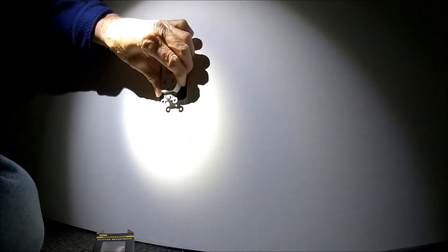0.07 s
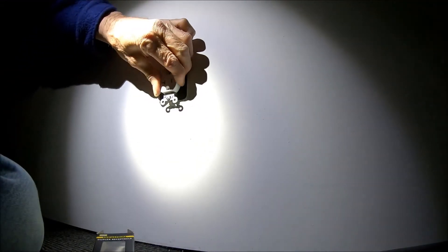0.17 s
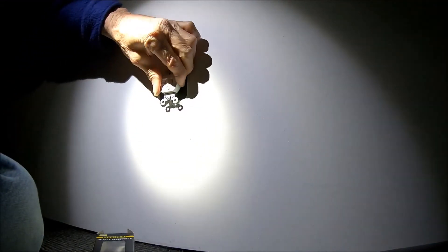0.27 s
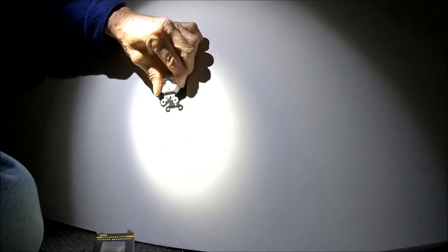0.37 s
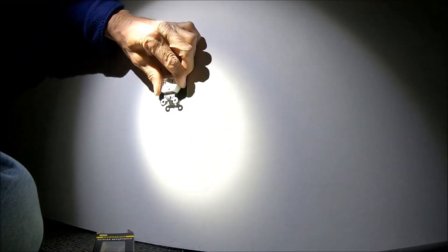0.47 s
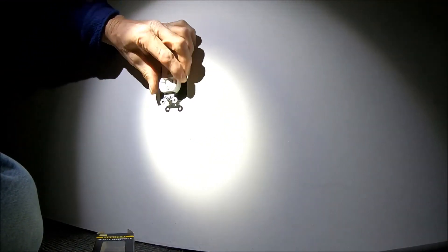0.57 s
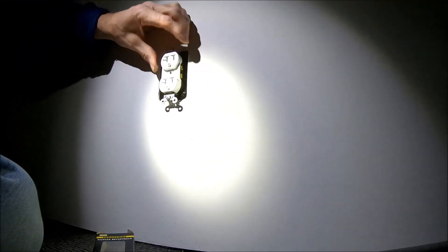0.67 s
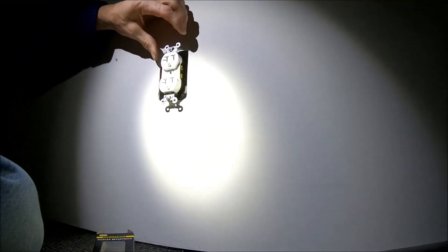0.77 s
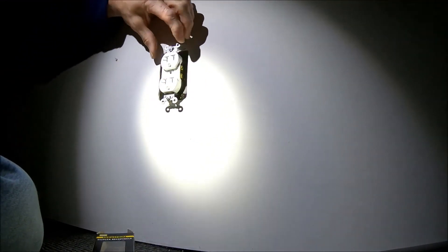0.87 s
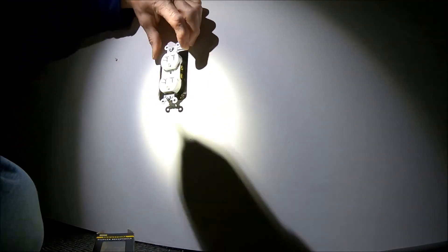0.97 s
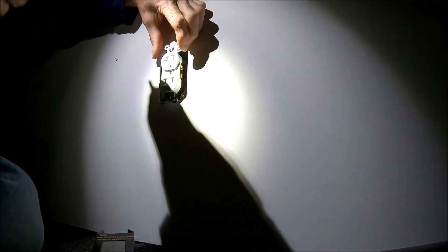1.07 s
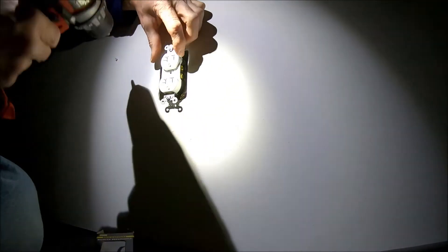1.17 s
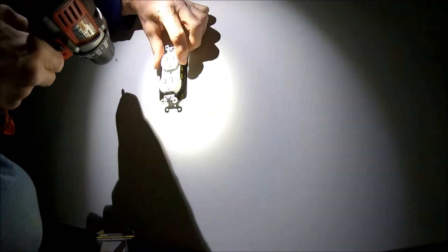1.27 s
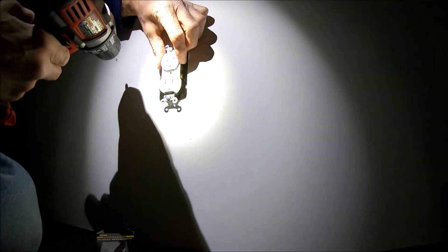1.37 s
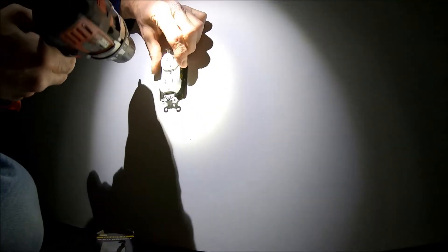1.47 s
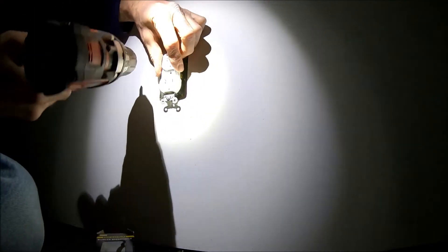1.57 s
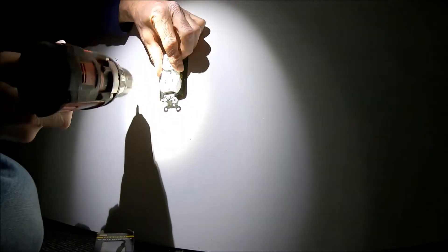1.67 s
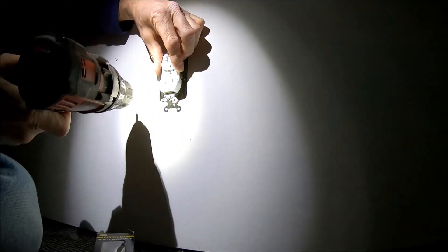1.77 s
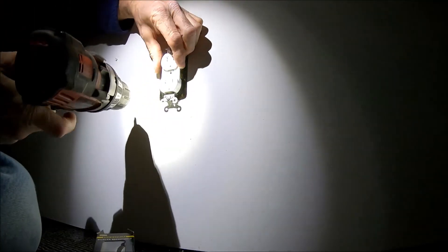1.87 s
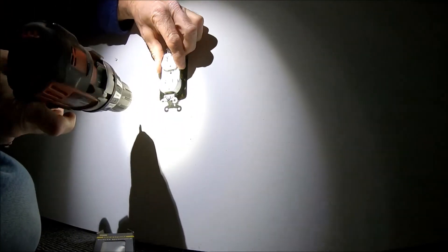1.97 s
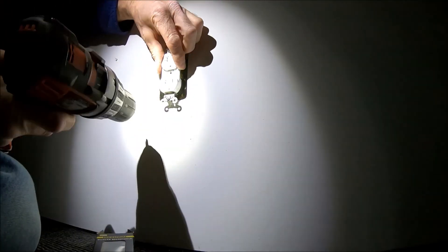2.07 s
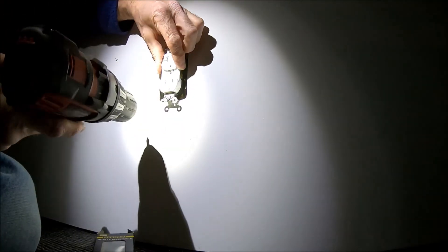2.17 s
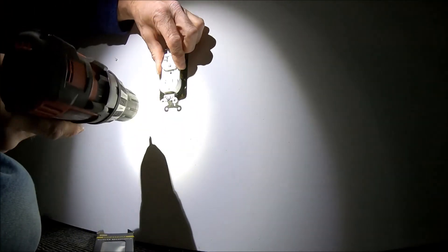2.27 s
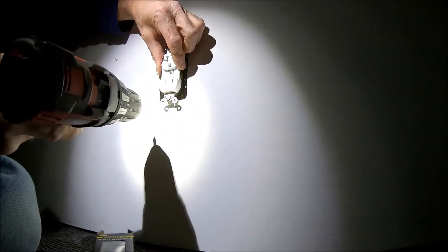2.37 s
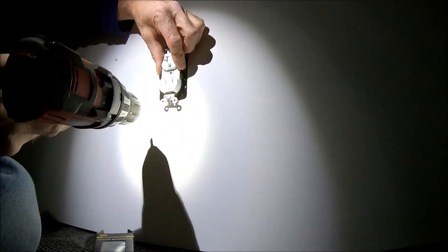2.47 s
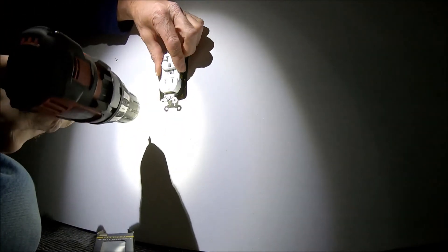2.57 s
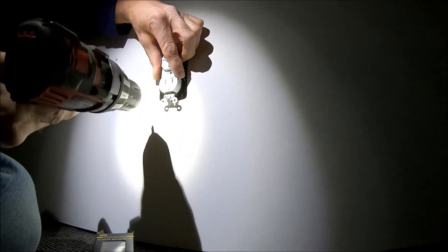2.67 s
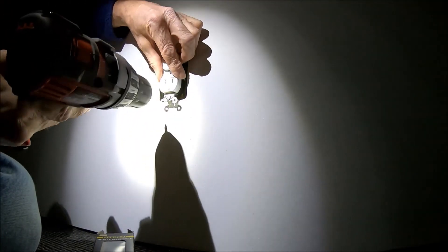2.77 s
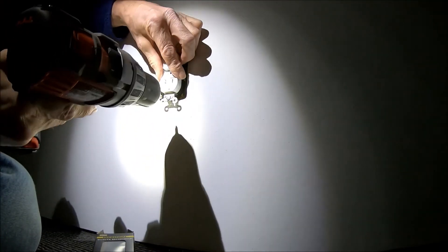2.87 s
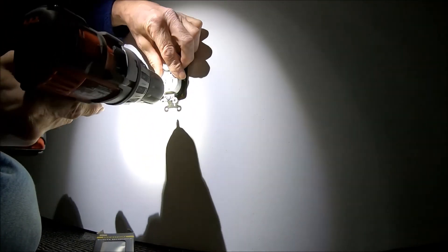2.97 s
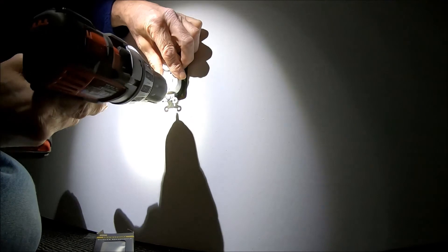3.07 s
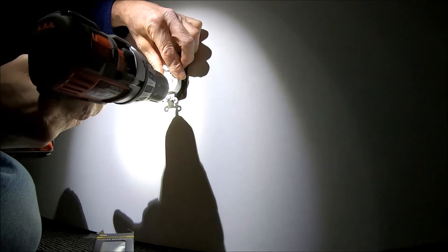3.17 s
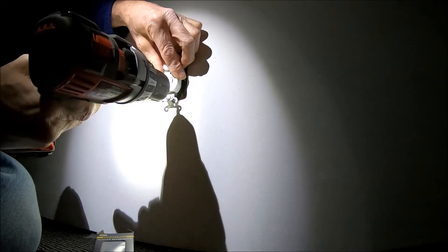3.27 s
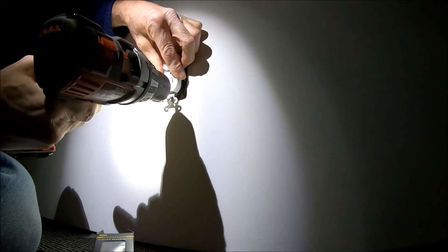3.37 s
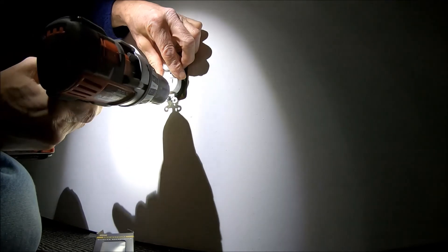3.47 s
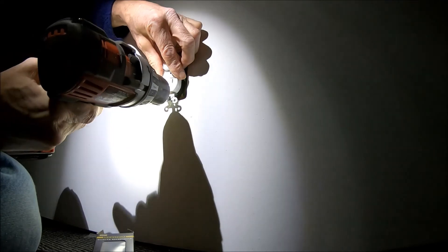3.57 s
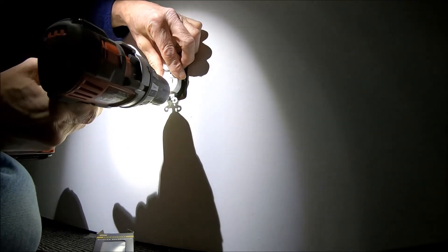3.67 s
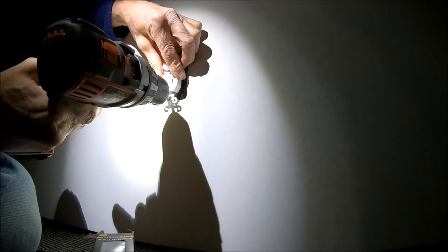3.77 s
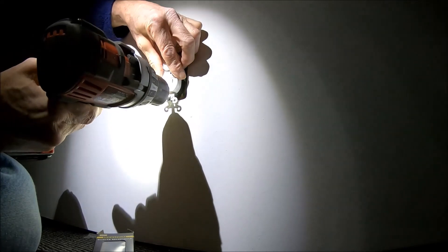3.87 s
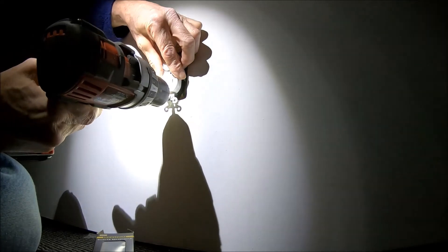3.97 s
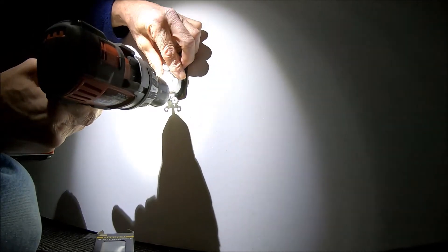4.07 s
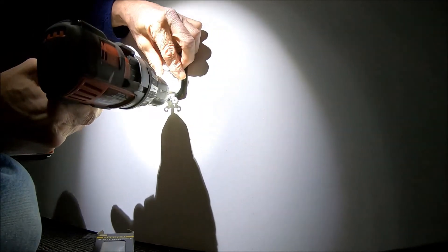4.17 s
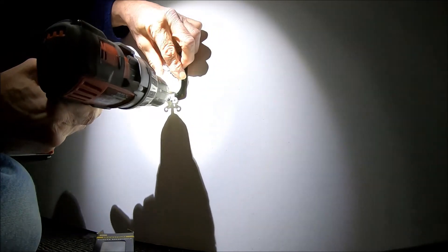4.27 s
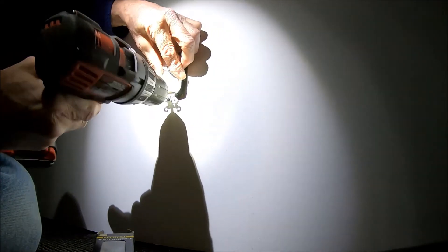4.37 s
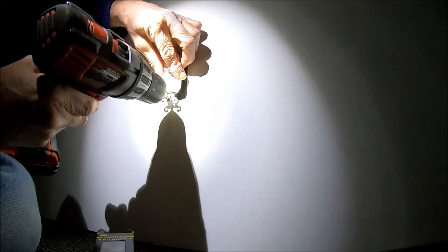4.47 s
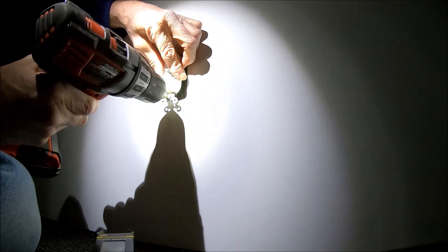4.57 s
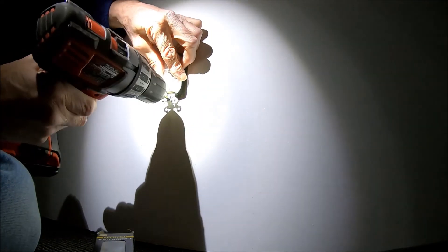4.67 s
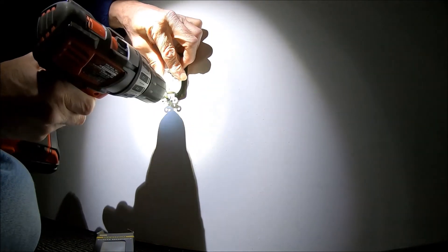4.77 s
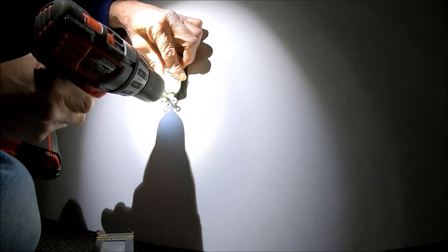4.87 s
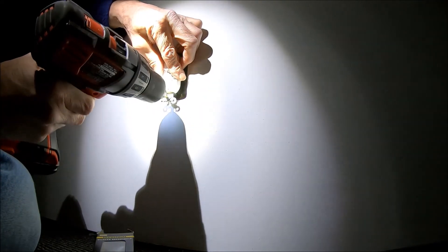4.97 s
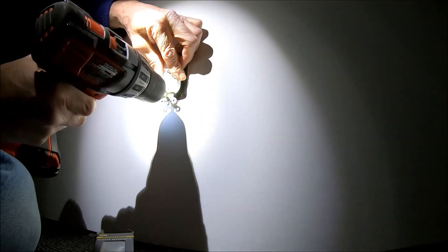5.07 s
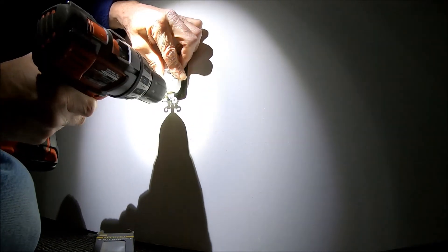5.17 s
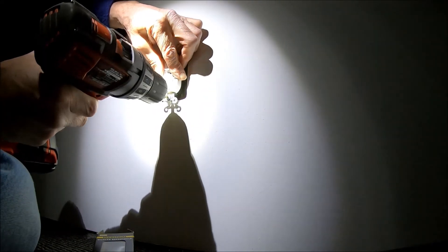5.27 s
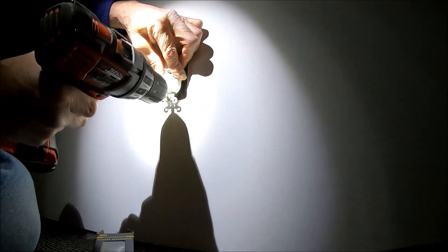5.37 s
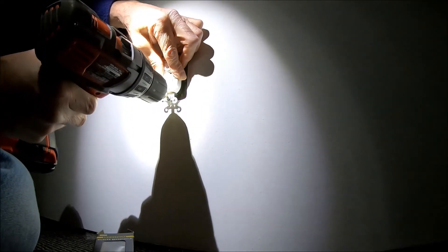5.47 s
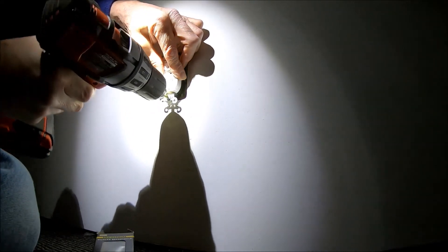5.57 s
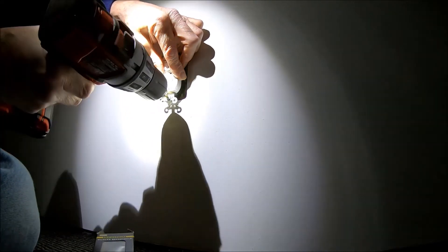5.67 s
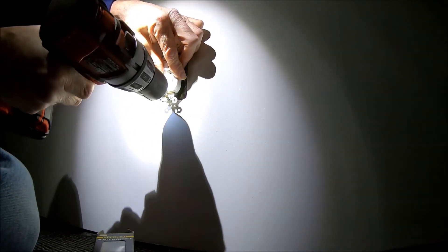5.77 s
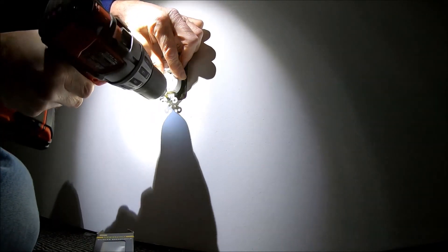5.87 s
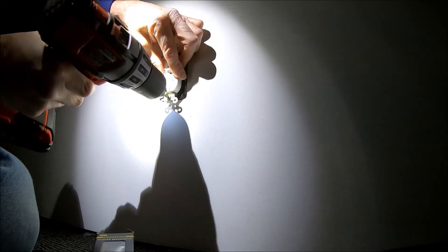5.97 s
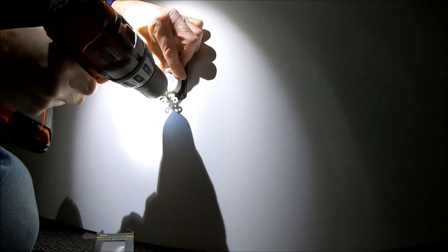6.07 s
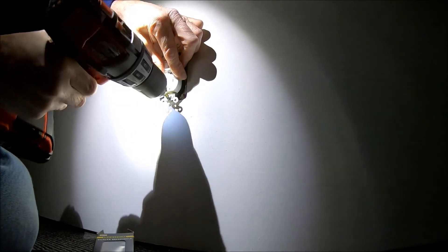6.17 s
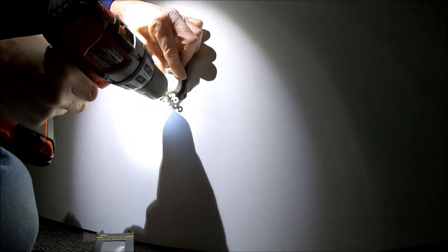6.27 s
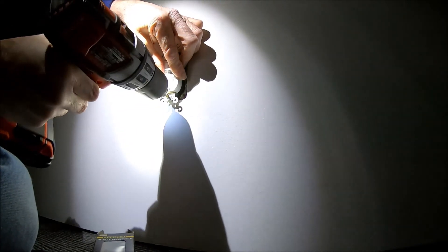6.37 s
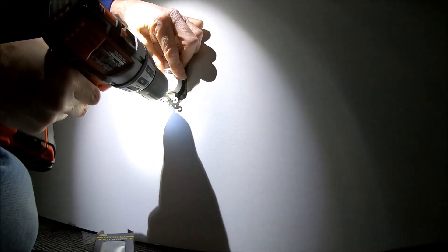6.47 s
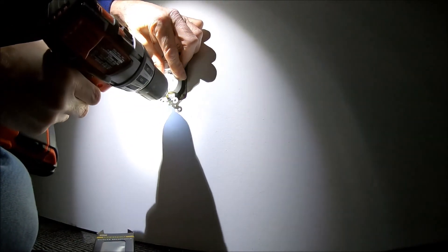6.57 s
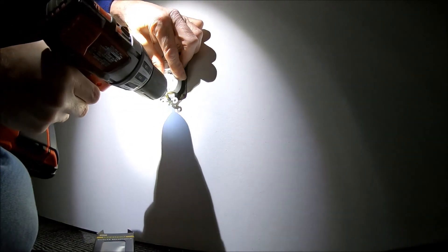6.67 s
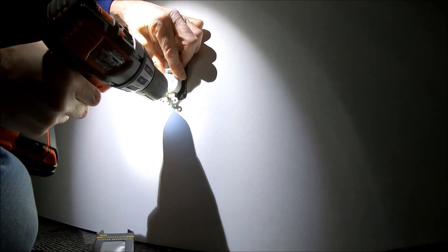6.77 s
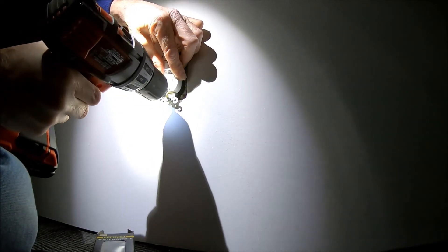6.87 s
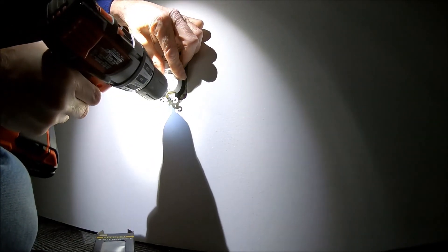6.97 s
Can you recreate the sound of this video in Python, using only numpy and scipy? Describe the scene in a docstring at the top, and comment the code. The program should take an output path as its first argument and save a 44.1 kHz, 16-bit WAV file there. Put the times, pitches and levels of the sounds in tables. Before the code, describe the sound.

Close indoor knocks, plastic clicks and sleeve rustle lead to a brief rising drill whine with rapid wall thumps, then a slower, sagging second run.

```python
"""A cordless drill whines over gear and brush noise, and the hollow plasterboard wall booms when its bit jumps
out of a screw head; before that, a hand knocks and clicks an electrical fitting into the wall.
The drill is speed-following tones over shaped noise, the wall a bank of decaying modes, each click a noise burst.
Shaped noise makes the rustling sleeves and still air; the house rumble adds a wandering drone, the mains hum
is sines. Everything is heard close, at two microphones."""
import sys
import numpy as np
from scipy import signal
from scipy.fft import rfft, irfft, next_fast_len
from scipy.io import wavfile
from scipy.ndimage import uniform_filter1d, map_coordinates

SR = 44100
rng = np.random.default_rng(int(sys.argv[2]) if len(sys.argv) > 2 else 0)


def to_wav(sig):
    """Store sig (one row per channel, or 1-D mono) as 16-bit WAV at the path in sys.argv[1].

    Samples outside -1..1 are clipped; the rate is SR.
    """
    pcm = np.clip(np.atleast_2d(sig), -1, 1) * 32767
    pcm = np.round(pcm).astype(np.int16)
    wavfile.write(sys.argv[1], SR, pcm.T)  # frames by channels


N = 309141


def amp(db):
    """Gain of a level in dB."""
    return 10 ** (np.asarray(db) / 20)


def unit(x):
    """x at rms 1."""
    return x / np.sqrt(np.mean(x ** 2) + 1e-20)


def along(points, hz):
    """(frequency [Hz], value) points read on a log frequency axis."""
    f, v = np.transpose(points)
    return np.interp(np.log(hz + 1), np.log(f + 1), v)


def curves(rows):
    """One value per sample for each column after the time."""
    s, *cols = np.transpose(rows)
    return [np.interp(np.arange(N) / SR, s, c) for c in cols]


def wobble(rate):
    """A smooth random curve with rate knots a second."""
    knots = rng.standard_normal(int(N * rate / SR) + 4)
    return map_coordinates(knots, [np.arange(N) * rate / SR])


def filtered(x, response):
    """x shaped by a complex response of frequency."""
    m = next_fast_len(x.shape[-1] + 8192)
    return irfft(rfft(x, m) * response(np.fft.rfftfreq(m, 1 / SR)), m)[..., :x.shape[-1]]


def resonance(f, centre_hz, width_hz):
    """Causal response of one resonance, 1 at its centre."""
    return 1j * f * width_hz / (centre_hz ** 2 - f * f + 1j * f * width_hz)


# stereo likeness of diffuse sound: (frequency [Hz], left-right correlation [0-1])
STEREO_LIKENESS = [(200, 0.96), (400, 0.73), (650, 0), (1400, 0.081), (3000, 0.64), (6000, 0)]


def rush(spectrum, patchy_db):
    """Diffuse stereo noise of rms 1, with random patches of gain in time and frequency."""
    z = signal.stft(rng.standard_normal((2, N)), nperseg=512)[2]
    patches = uniform_filter1d(rng.standard_normal(z.shape[1:]), size=5, axis=0)
    patches = uniform_filter1d(patches, size=8, axis=1)
    pair = signal.istft(z * amp(patchy_db * unit(patches)), nperseg=512)[1][:, :N]

    def mid_side(hz):
        angle = np.arccos(np.clip(along(STEREO_LIKENESS, hz), -1, 1)) / 2
        return amp(along(spectrum, hz)) * [np.cos(angle), np.sin(angle)]

    mid, side = filtered(pair, mid_side)
    return unit(np.array([mid + side, mid - side]))


# decay of the room: (frequency [Hz], time to fall 60 dB [s])
ROOM_DECAY = [(300, 0.24), (1000, 0.15), (4000, 0.1), (12000, 0.088)]


def room(x):
    """Mono x in a fresh stereo noise tail in which each frequency dies at its own speed."""
    hz, t, z = signal.stft(rng.standard_normal((2, SR // 4)), SR, nperseg=256)
    decay = amp(-60 * t / along(ROOM_DECAY, hz)[:, None])
    tail = signal.istft(z * decay, SR, nperseg=256)[1]
    delayed = np.pad(x, (130, 0))[None]  # the tail starts 130 samples late
    return signal.fftconvolve(delayed, tail / np.linalg.norm(tail[0]), axes=1)


# one list per trigger pull: (time [s], gear mesh frequency [Hz], gear noise level [dB])
TRIGGER_PULLS = [
    [(4.85, 251.4, -47.5), (4.868, 328.5, -25), (4.9, 904.4, -22), (4.94, 1203, -23), (4.99, 1478, -23.5),
     (5.05, 1621, -27.5), (5.12, 1704, -27.5), (5.17, 1673, -28), (5.2, 1607, -28.5), (5.225, 1476, -32),
     (5.25, 1310, -46), (5.31, 992, -69)],
    [(5.83, 397, -58), (5.872, 852.5, -34.5), (5.896, 913, -30), (5.922, 925.7, -32), (5.945, 1109, -27.5),
     (5.975, 1225, -27.5), (6.015, 1255, -29), (6.055, 1399, -28), (6.075, 1428, -27.5), (6.236, 1069, -31),
     (6.258, 1136, -31.5), (6.29, 1160, -30.5), (6.414, 963.5, -31), (6.5, 795, -32), (6.62, 606.5, -33),
     (6.75, 850, -37.5), (6.87, 480, -41.5), (7.01, 341.1, -49)],
]
# gear noise spectrum: (frequency [Hz], relative level [dB per Hz])
GEAR_SPECTRUM = [(200, -40), (400, -16.5), (734, -18), (1320, -7), (1850, -14), (2170, -10.5), (2530, -12),
                 (3410, -7.5), (4940, -12), (5460, -11.5), (8610, -13), (10200, -19), (10900, -33),
                 (13800, -34), (15000, -48.5)]
# drill housing resonances: (frequency [Hz], width [Hz], lift over the noise [dB])
HOUSING_MODES = [(1430, 250, 3), (2250, 130, 2), (2790, 90, 5), (3450, 150, 3), (3850, 90, 5),
                 (4250, 80, 3), (4500, 90, 6), (5500, 200, 3), (7500, 300, 2)]
# housing radiation of the mesh tone: (tone frequency [Hz], level over the gear noise [dB])
MESH_RADIATION = [(330, -13), (700, -19), (1000, -19), (1150, -8), (1250, -9.5), (1450, 2), (1600, -4.5),
                  (1710, -6.5)]
# housing radiation of the tone at three times the mesh: (tone frequency [Hz], level over the gear noise [dB])
THIRD_RADIATION = [(1800, -27.5), (2600, -25), (2760, -2), (2900, -11), (3280, 4), (3550, 3), (3750, -3),
                   (3980, -14.5), (4220, 4.5), (4450, 3), (4700, 0.5), (4930, -8), (5110, 8)]
# stereo lean of the drill: (frequency [Hz], left minus right level [dB])
DRILL_BALANCE = [(60, 1), (180, 2.5), (540, -4), (1640, 3.5), (4950, -1.5), (14900, -0.5)]
TONE_END_S, TONE_FALL_DB_PER_S = (5.2, 6.95), 500  # in each pull the tones begin to fade at these times [s], then fall steadily [dB per s]


def mesh_tones(mesh_hz, tone_db, turn):
    """Gear teeth sing at 1, 2, 3 and 6 times the mesh frequency, as loud as the housing radiates each."""
    mesh_db = tone_db + along(MESH_RADIATION, mesh_hz)
    third_db = tone_db + along(THIRD_RADIATION, 3 * mesh_hz)
    tones = amp(mesh_db + .8 * wobble(40)) * np.sin(turn)
    tones += amp(third_db + .8 * wobble(40)) * np.sin(3 * turn)
    # the even multiples swell as they cross a resonance of the housing
    second = abs(resonance(2 * mesh_hz, 3300, 500)) ** 2 + .5 * abs(resonance(2 * mesh_hz, 1380, 200)) ** 2
    tones += amp(tone_db - 2 + wobble(40)) * second * np.sin(2 * turn)
    sixth = sum(abs(resonance(6 * mesh_hz, hz, 400)) ** 2 for hz in (9600, 5500, 4400, 3800))
    return tones + amp(tone_db - 11) * sixth * np.sin(6 * turn)


def gear_noise(mesh_hz, noise_db, turn):
    """Gear and brush noise throbs once per rotor turn (nine teeth) and brightens with speed."""
    def shell(f):
        return 1 + sum((amp(db) - 1) * abs(resonance(f, c, w)) for c, w, db in HOUSING_MODES)

    throb = 1 + 0.075 * np.sin(turn / 9)
    gears = filtered(rush(GEAR_SPECTRUM, patchy_db=2.5) * throb * amp(0.46 * wobble(60)), shell)
    treble = filtered(gears, lambda f: f ** 2 / (f ** 2 + 4500 ** 2))
    bright = amp(5.5 * np.log2(mesh_hz / 1100))  # 5.5 dB per octave of speed
    return amp(noise_db) * unit(gears - treble + bright * treble)


def panel_shake(noise_db):
    """The turning screw shakes the panel without a break: noise through three low panel resonances."""
    def panel(f):
        return resonance(f, 184, 24) + 0.33 * resonance(f, 160, 46) + 0.13 * resonance(f, 270, 53)

    return amp(noise_db - 8.0) * unit(filtered(rng.standard_normal(N), panel))


def drill():
    """Each trigger pull sets the motor speed, which carries mesh tones, gear noise and panel shake."""
    out, t = np.zeros((2, N)), np.arange(N) / SR

    def lean(f):
        return amp(np.outer([.5, -.5], along(DRILL_BALANCE, f)))

    for rows, tone_end_s in zip(TRIGGER_PULLS, TONE_END_S):
        mesh_hz, noise_db = curves(rows)
        tone_db = noise_db - TONE_FALL_DB_PER_S * np.maximum(t - tone_end_s, 0)
        start_s, end_s = rows[0][0], rows[-1][0]
        fade_in = np.clip((t - start_s) / .012, 0, 1)
        fade_out = np.clip((end_s - t) / .02 + (end_s > 7), 0, 1)  # a pull lasting past 7 s has no fade
        on = fade_in * fade_out
        turn = 2 * np.pi * np.cumsum(mesh_hz * (1 + .0015 * wobble(120))) / SR  # mesh phase [rad]
        tones = mesh_tones(mesh_hz, tone_db, turn)
        gears = gear_noise(mesh_hz, noise_db, turn)
        out += on * panel_shake(noise_db)
        out += on * filtered(gears + tones, lean)
        out += amp(-15) * room(on * tones)[:, :N]
    return out


# blows on the wall panel: (time [s], level [dB], contact [ms])
WALL_BLOWS = [(.224, -24.5, 0.39), (.326, -24.5, 0.42), (0.3653, -17, 0.35), (0.6091, -10, 0.33),
              (0.901, -31.5, 1.8), (3.638, -13, 1.45), (3.795, -21, 3.9), (3.913, -24.5, 1.5),
              (4.083, -11, 0.52), (4.19, -27.5, 2.2), (4.267, -6, 2.46), (4.397, -11.5, 0.55),
              (4.596, -28, 2.1), (4.6919, -12.5, 1.3), (4.801, -35, 2.1), (4.902, -25, 1.5),
              (4.926, -7, 2.5), (4.988, 0.5, 0.31), (5.043, 1, 0.58), (5.097, -.5, 0.39),
              (5.1485, -0.5, 0.26), (5.2038, 1.5, 0.41), (5.903, 0.5, 0.21), (6.0798, 2, 2.04),
              (6.2796, 0, 1.1), (6.6334, 1.5, 0.2)]
# wall panel and cavity modes: (frequency [Hz], relative level [dB], time to fall 60 dB [s],
# first swing [1 outward, -1 inward])
WALL_MODES = [(62, -35, .43, 1), (69.5, -19, .16, -1), (83.5, -10, .081, 1), (85.5, -16.6, .32, -1),
              (99.9, -14, .37, -1), (103.9, -23, .55, 1), (115, -20, .55, -1), (128.8, -19, .27, -1),
              (143.2, -22, .39, 1), (153.1, -14, .25, 1), (161.7, -15.7, .28, 1), (170.9, -25, .4, 1),
              (184, -9, .24, -1), (197.2, -17, .18, 1), (245.4, -34, .38, -1), (275.7, -22, .2, -1),
              (310.3, -19, .116, 1), (309.2, -23, .27, -1), (329.5, -27.5, .22, -1), (373.6, -27, .14, 1),
              (390.7, -19, .066, 1), (500, -28, .043, -1), (550, -29, .062, -1), (707, -24, .03, 1),
              (900, -27, .03, -1)]


def wall():
    """Every blow rings the same panel modes; a longer contact loses the upper ones."""
    out, t = np.zeros(N + SR), np.arange(SR // 2) / SR
    onset = 1 - np.exp(-t / 0.00077)
    for s, db, contact_ms in WALL_BLOWS:
        ring = np.zeros(len(t))
        for hz, level, t60, way in WALL_MODES:
            soft = 1 / (1 + (hz * contact_ms / 700) ** 2)
            decay = amp(level + rng.normal(0, 1.0) - 60 * t / t60)  # each mode varies from blow to blow
            ring += np.sign(way) * soft * decay * np.sin(2 * np.pi * hz * t)
        out[round(s * SR):][:len(t)] += amp(db) * ring * onset
    # the room returns mainly the upper modes
    upper = filtered(out[:N], lambda f: (1j * f / (500 + 1j * f)) ** 4)
    return out[:N] * amp([[-.4], [.4]]) + amp(2.5) * room(upper)[:, :N]


# clicks and scrapes of metal and plastic: (time [s], peak level [dB], centre [Hz], time to fall 60 dB [ms],
# box rattle against the crack [dB], left minus right level [dB])
FITTING_CLICKS = [(0.187, -49, 1360, 280, -10, 0), (0.359, -43, 3280, 45, -12, -2),
                  (0.597, -37, 2530, 220, 5, -5), (.212, -38, 1960, 54, 3.5, -4),
                  (0.3274, -34.5, 2190, 28, 6, -0.5), (0.3706, -17, 2120, 32, -3.5, -2),
                  (.6117, -10.5, 2400, 16.4, -5.5, 2), (.771, -46.5, 1060, 150, -2.5, 0),
                  (0.8983, -43, 1380, 59, -2.5, 1), (1.29, -40.5, 1300, 52, -2, 2),
                  (2.4781, -16.5, 1807, 14.7, -34.5, 7.5), (2.499, -15, 3800, 14, -36.5, -7.5),
                  (2.501, -22, 1883, 9.8, -39, 13), (2.6844, -42, 2100, 36, -32, 3),
                  (3.23, -49.5, 1460, 17, -36, 13), (3.6383, -53.5, 2490, 32, 12, -4.5),
                  (4.0858, -28.5, 2460, 24.5, 0, -2), (4.2678, -40, 2200, 43, 8, -1),
                  (4.384, -51, 2184, 60, -12, 3), (4.3987, -21, 2594, 38.4, -1.5, -5),
                  (4.596, -49, 3060, 14, -19.5, 4.5), (4.6946, -43, 1780, 21, 3, 1),
                  (4.7282, -47.5, 4370, 20, -31, 0), (4.7407, -47, 3410, 9, -26.5, 8),
                  (4.7988, -39, 2440, 15, -28, 4.5), (5.83, -54, 2970, 11, -28, -8),
                  (5.8003, -50, 2660, 17, -31, 7), (5.906, -19, 2430, 32, -4.5, 11),
                  (6.0825, -30, 2550, 32, -1.5, -5), (6.2815, -27.5, 2500, 19, -1, 2),
                  (6.6352, -23.5, 2500, 25, -1, -1)]
# wall box resonances: (frequency [Hz], width [Hz], level [dB])
BOX_MODES = [(284.7, 15, 1.5), (371.4, 37, -3), (529, 105, -1), (642, 130, -3.5), (810, 220, -9)]


def clicks():
    """A noise burst around its own pitch, the rattle of the wall box and the answer of the room."""
    out, t = np.zeros((2, N + SR)), np.arange(SR // 4) / SR

    def box(f):
        modes = sum((-1) ** k * amp(db) * resonance(f, c, w) for k, (c, w, db) in enumerate(BOX_MODES))
        return modes * resonance(f, 310, 500)

    for s, db, centre_hz, length_ms, box_db, pan_db in FITTING_CLICKS:
        def body(f):
            low = resonance(f, centre_hz, 0.63 * centre_hz) ** 2 + 0.31 * resonance(f, 1.405 * centre_hz, 1200)
            fixed = 0.055 * resonance(f, 8000, 6000) + 0.04 * resonance(f, 1200, 990)
            return (low + fixed) * resonance(f, 2500, 8800) / (1 + (f / 10300) ** 12)

        # a longer scrape also starts more softly
        burst = rng.standard_normal((2, len(t))) * (1 - np.exp(-t * 1000 / (.05 * length_ms)))
        crack = filtered(burst[0] * amp(-60 * t * 1000 / length_ms), body)
        rattle = filtered(burst[1] * (amp(-60 * t / 0.092) + 1.3 * amp(-60 * t / 0.005)), box)
        dry = amp(db) * (crack / abs(crack).max() + amp(box_db) * rattle / abs(rattle).max())
        wet = amp(-4.5) * room(dry)
        at = round(s * SR)
        out[:, at:at + len(t)] += dry * amp([[pan_db / 2], [-pan_db / 2]])
        out[:, at:at + wet.shape[1]] += wet
    return out[:, :N]


def swells(rows, slopes):
    """Gain of each (start, end, level) row: a rise, a hold and a fall, both slopes steady in dB."""
    start, end, db = np.transpose(rows)[:3, :, None]
    t = np.arange(N) / SR
    return amp(db - slopes[0] * np.maximum(start - t, 0) - slopes[1] * np.maximum(t - end, 0))


# strokes of the sleeves: (start [s], end [s], level [dB])
SLEEVE_STROKES = [(0, .11, -64), (.35, .6, -72), (.72, 1.1, -56), (1.28, 1.37, -56), (1.52, 1.62, -56),
                  (1.73, 1.77, -60), (1.9, 2.16, -63), (2.38, 2.42, -66), (2.5, 2.62, -67),
                  (2.73, 3.24, -58), (3.3, 3.52, -66.5), (4.1, 4.5, -75), (4.5, 5.3, -68.5),
                  (5.65, 7.01, -77.5)]
# cloth noise spectrum: (frequency [Hz], relative level [dB per Hz])
CLOTH_SPECTRUM = [(290, -9), (500, -8.5), (544, -48), (591, -8.5), (898, -10.5), (1500, 0.5), (3780, -2),
                  (9090, -11), (14000, -37)]


def sleeves():
    """Cloth rubs in strokes of patchy noise over a faint constant rustle."""
    strokes = swells(SLEEVE_STROKES, slopes=(90, 160))  # rise and fall [dB per s]
    level = (strokes.max(axis=0) + amp(-89.5)) * amp(1.3 * wobble(30))
    return level * rush(CLOTH_SPECTRUM, patchy_db=2.3)


# lumps of low rumble: (start [s], end [s], level [dB], centre [Hz])
RUMBLE_LUMPS = [(0, 0.017, -41, 58.2), (0.283, .55, -48, 58.76), (.63, .73, -30.5, 57.36),
                (.8, 1.028, -39.5, 57.85), (1.28, 1.356, -32.5, 26.56), (1.4, 1.554, -45, 31.74),
                (1.697, 1.764, -45, 49.8), (1.882, 2.002, -34, 43.5), (2.05, 2.248, -43.5, 53),
                (2.29, 2.657, -39, 59.46), (3.028, 3.177, -38, 45.34), (3.683, 3.742, -43.5, 51.7),
                (3.85, 4.05, -45.5, 56.9), (4.26, 4.372, -31, 55.2), (4.449, 5.353, -46.5, 57.5),
                (5.494, 5.75, -48.5, 51.63), (6.0, 6.86, -46.5, 57.5)]
# rumble noise spectrum: (frequency [Hz], relative level [dB per Hz])
HOUSE_SPECTRUM = [(12, -36), (20, -4.5), (33, -5.5), (54, 4), (74, -2), (91, -34.5), (130, -20), (170, -61),
                  (290, -120)]


def house_rumble():
    """The house rumbles in lumps: low noise and a wandering drone of changing pitch."""
    lumps = swells(RUMBLE_LUMPS, slopes=(150, 200))  # rise and fall [dB per s]
    # the loudest lump dominates the pitch
    centre_hz = np.transpose(RUMBLE_LUMPS)[-1] @ lumps / lumps.sum(axis=0)
    phase = 2 * np.pi * np.cumsum(centre_hz * (1 + 0.0824 * wobble(7.9))) / SR
    drone = np.sin(phase) * amp(1.2 * wobble(11))
    noise = rush(HOUSE_SPECTRUM, patchy_db=1.4)
    return (lumps.max(axis=0) + amp(-56)) * (0.5 * noise + 0.71 * drone)


# hum level: (time [s], level [dB])
HUM_LEVEL = [(0, -47.5), (1, -49), (2, -46), (3, -47), (4.9, -50), (5.35, -62.5), (5.85, -56), (7.01, -49)]


def mains_hum():
    """A hum near 240 Hz drones with a weaker, less steady tone near 211 Hz."""
    t, (hum_db,) = np.arange(N) / SR, curves(HUM_LEVEL)
    hum = amp(hum_db + 1.5 * wobble(7)) * np.sin(2 * np.pi * 240.3 * t + .25 * wobble(6))
    low_db = hum_db - 12.0 + 4.8 * wobble(11)
    return hum + amp(low_db) * np.sin(2 * np.pi * 211 * t + 0.46 * wobble(8.6))


# still air spectrum: (frequency [Hz], relative level [dB per Hz])
AIR_SPECTRUM = [(60, -37.5), (100, -8.5), (150, -2), (210, 1.5), (290, -5.5), (400, -18.5), (600, -24),
                (1500, -26), (10000, -64.5), (11000, -100)]


def still_air():
    """Room tone is diffuse noise that follows the hum level at about half its dB swing."""
    (hum_db,) = curves(HUM_LEVEL)
    return amp(0.55 * hum_db - 26.5) * rush(AIR_SPECTRUM, patchy_db=1.8)


def scene():
    """All sources at the two microphones."""
    return drill() + wall() + clicks() + sleeves() + house_rumble() + mains_hum() + still_air()


def record(dry):
    """Nothing passes from the band limit of 15200 Hz upward."""
    return filtered(dry, lambda hz: hz < 15200)


dry = scene()
out = record(dry)
to_wav(out)
```